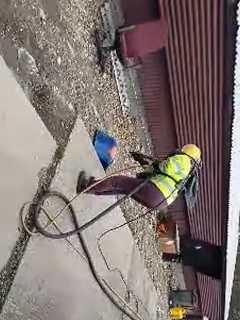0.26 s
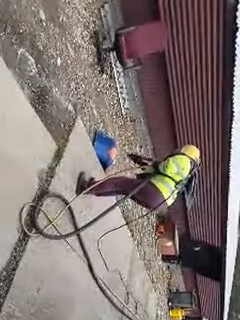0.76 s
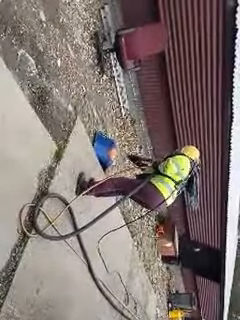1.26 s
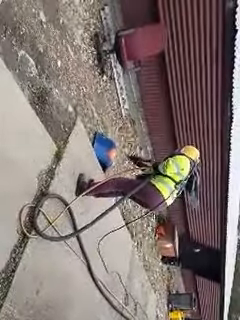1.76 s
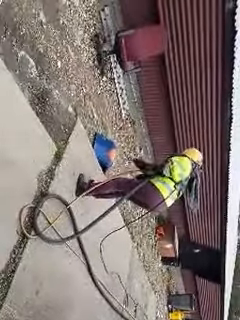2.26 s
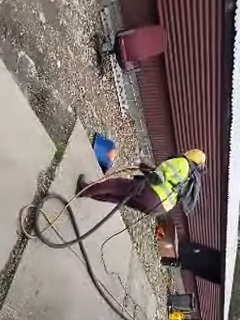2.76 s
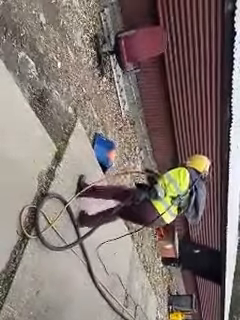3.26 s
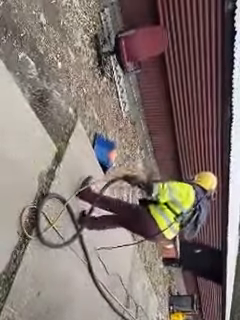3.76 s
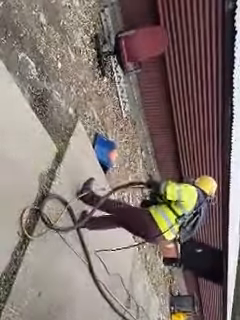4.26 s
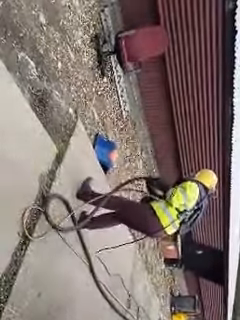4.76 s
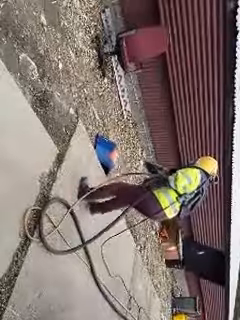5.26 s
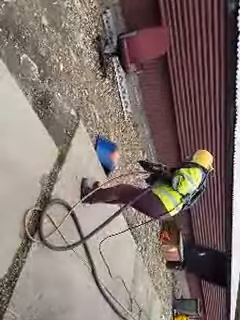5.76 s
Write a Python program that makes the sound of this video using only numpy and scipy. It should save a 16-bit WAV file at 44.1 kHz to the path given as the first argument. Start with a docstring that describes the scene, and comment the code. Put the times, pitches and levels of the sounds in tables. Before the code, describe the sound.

Abrasive blasting roars as a bright steady hiss with faint whistles and sputtering overload; it stops for a moment, leaving compressor drone, then restarts.

```python
"""A loud hiss of air and grit blasting a steel-clad wall outdoors; it stops briefly and starts again.
The jet is coloured noise with short sine screeches, echoed by ground and wall as the nozzle moves.
A compressor drones behind it, as steady tones over a rumble, and comes up when the gain control lets go.
The jet overloads the two microphone ports, the right one most: random thuds sputter, short pushes pop.
Apart from that, soft blips of random pitch burble in the low end."""
import sys
import numpy as np
from scipy import signal
from scipy.fft import rfft, irfft, next_fast_len
from scipy.io import wavfile
from scipy.ndimage import uniform_filter1d, map_coordinates

SR = 44100
rng = np.random.default_rng(int(sys.argv[2]) if len(sys.argv) > 2 else 0)


def transcribe(u):
    """Save the signal u as a 16-bit wav file named by the first command-line argument.

    u: samples, shape (n,) or (channels, n), limited to [-1, 1]; the rate is SR.
    q: integer samples, one column per channel.
    """
    v = np.clip(np.atleast_2d(u).T, -1, 1)
    q = np.round(v * 32767).astype(np.int16)
    wavfile.write(sys.argv[1], SR, q)


N = 265923


def amp(db):
    """Turn decibels into a plain gain."""
    return 10 ** (np.asarray(db) / 20)


def unit(x):
    """Scale a sound to an rms of 1."""
    return x / np.sqrt(np.mean(x ** 2) + 1e-20)


def along(points, hz):
    """Read a curve of (Hz, value) points at any pitch, on a log pitch axis."""
    f, v = np.transpose(points)
    return np.interp(np.log(hz + 1), np.log(f + 1), v)


def clock():
    """The time of every sample, in seconds."""
    return np.arange(N) / SR


def curves(rows):
    """One value per sample for each column after the time."""
    s, *cols = np.transpose(rows)
    return [np.interp(clock(), s, c) for c in cols]


def wobble(rate):
    """A smooth random curve through `rate` random points a second."""
    knots = rng.standard_normal(int(N * rate / SR) + 4)
    return map_coordinates(knots, [clock() * rate])


def bell(s, width):
    """A smooth swell of height 1 around time s; width is its standard deviation in seconds."""
    return np.exp(-.5 * ((clock() - s) / width) ** 2)


def filtered(x, response):
    """Weight every pitch in x by a response, a function of Hz."""
    m = next_fast_len(N + SR // 2)  # spare room for the ringing
    spectrum = rfft(x, m) * response(np.fft.rfftfreq(m, 1 / SR))
    return irfft(spectrum, m)[..., :N]


# force of the jet while the valve is open, ahead of the gain control: t/s, level/dB
JET_FORCE = [(0, 18.5), (.32, 17.5), (.7, 20), (1.4, 18.5), (2.1, 17), (3, 14.2), (3.7, 14), (4.1, 12.8),
             (4.6, 12), (5.15, 16), (5.35, 15), (6.03, 16.5)]
# the valve shuts: the jet collapses fast, then a weak tail bleeds from the hose
SHUT_S, COLLAPSE_DB_PER_S, TAIL_DB, TAIL_DB_PER_S = 4.6005, 468, -26, 131
# the valve reopens and the pressure builds ever faster, from this far below full force
REOPEN_S, BUILD_S, BUILD_CURVE, SHUT_DROP_DB = 4.885, 0.095, 1.5, 65
# one last spit of the emptying hose: time, width and lift
SPIT_S, SPIT_LENGTH_S, SPIT_DB = 4.727, .007, 7.5


def jet_level():
    """Level of the jet in dB: its force, less the pause in which the valve is shut."""
    t = clock()
    force_db, = curves(JET_FORCE)
    shut = np.maximum(t - SHUT_S, 0)
    dying = np.maximum(-COLLAPSE_DB_PER_S * shut, TAIL_DB - TAIL_DB_PER_S * shut)
    progress = np.clip((t - REOPEN_S) / BUILD_S, 0, 1)
    building = SHUT_DROP_DB * (progress ** BUILD_CURVE - 1)
    spit = SPIT_DB * bell(SPIT_S, SPIT_LENGTH_S)
    return force_db + np.maximum(dying, building) + spit


def turbulence(patchy_db, shared):
    """Churning air as noise at two ports, partly the same sound, with random louder and softer patches."""
    direct, *scattered = rng.standard_normal((3, N))
    noise = shared * direct + np.array(scattered)
    z = signal.stft(noise, nperseg=512)[2]
    field = rng.standard_normal(z.shape[1:])
    field = uniform_filter1d(field, size=6, axis=0)  # smooth across pitch
    field = uniform_filter1d(field, size=12, axis=1)  # smooth across time
    return signal.istft(z * amp(patchy_db * unit(field)), nperseg=512)[1][:, :N]


# turbulent mixing noise of the jet, only the shape counts: f/Hz, relative level/dB
HISS = [(150, -71), (480, -42), (780, -16.5), (1130, -20), (1350, -10.5), (1700, -13), (1900, -5.5),
        (2400, -7), (3400, -5.5), (4400, -5), (5500, 2), (7000, -1), (8500, -5.5), (10200, -6), (11300, -9),
        (14500, -10)]
# humps of the shock noise and of the nozzle, on the same scale: f/Hz, width/Hz, relative level/dB
HUMPS = [(1860, 240, -15), (5800, 380, -4.5), (6060, 980, -5.5), (6540, 1800, -6.5)]


def jet_colour(hz):
    """Tone of the jet: broad mixing noise plus the shock and nozzle humps, added as power."""
    humps = 0
    for centre, width, db in HUMPS:
        offset = 2 * (hz - centre) / width
        humps = humps + amp(db) ** 2 / (1 + offset ** 2) ** 2
    return np.sqrt(amp(along(HISS, hz)) ** 2 + humps)


# echoes from ground and wall: delay/ms, strength as a plain gain
ECHOES = [(2.9, 0.036), (5.6, 0.25), (9.5, 0.38), (17, 0.23)]


def echoed(x, drift):
    """Echo paths drift as the nozzle moves and comb the hiss differently at each port."""
    t, out = clock(), x.copy()
    for side in range(2):
        for ms, strength in ECHOES:
            delay = ms / 1000 * (1 + drift * wobble(1.2))
            out[side] += strength * np.interp(t - delay, t, x[side], left=0)
    return out


# how the nozzle points at the microphone: t/s, treble level/dB
AIM = [(0, -1), (.8, -3), (2, -3), (3.1, -3.5), (3.8, -3), (4.4, -1.5), (5.2, -2.5), (6.03, -4)]
# the two ports hear the jet differently: f/Hz, left minus right level/dB
PORTS = [(700, 6), (1200, -4.5), (1950, 2.5), (3200, 1), (4400, -2.5), (5600, 2), (7000, -6.5), (8700, -9),
         (14000, -8)]


def jet():
    """Hiss and screech with echoes; it flutters with the grit feed and dulls as the pressure falls."""
    level_db, (treble_db,) = jet_level(), curves(AIM)

    def ports(hz):
        return amp(np.outer([.5, -.5], along(PORTS, hz)))

    air = turbulence(patchy_db=1.09, shared=0.43)
    hiss = unit(filtered(air, lambda hz: jet_colour(hz) * ports(hz)))
    treble = filtered(hiss, lambda hz: 1 / (1 + (8000 / (hz + 1)) ** 6))
    slack_db = np.minimum(level_db + 6, 0)  # how far the jet is below -6 dB
    hiss = hiss + (amp(treble_db + 0.21 * slack_db) - 1) * treble
    flutter_db = 0.89 * wobble(16) + 0.38 * wobble(140)
    return amp(level_db + flutter_db) * unit(echoed(hiss + screech(), drift=0.0152))


# compressor engine orders, ahead of the gain control: f/Hz, rms level/dB
ENGINE = [(80.7, -50), (161.5, -48), (242.2, -69), (323, -70)]
# outdoor rumble around the compressor, only the shape counts: f/Hz, relative level/dB
YARD = [(25, -7), (120, 8), (300, -9), (450, -4), (700, 5), (1100, 1), (3000, -4), (12000, -36)]


def compressor():
    """The engine's firing orders, as slightly unsteady sines, over a soft outdoor rumble."""
    turn = clock() + np.cumsum(0.004 * wobble(21)) / SR  # running time of an engine that is not quite even
    drone = np.zeros(N)
    for hz, db in ENGINE:
        drone += amp(db) * np.sqrt(2) * np.sin(2 * np.pi * hz * turn)
    rumble = unit(filtered(rng.standard_normal((2, N)), lambda hz: amp(along(YARD, hz))))
    return drone + amp(-46.0) * rumble


def gain_control(x, knee_db, window):
    """Above the knee the level grows a third as fast, which pushes the compressor drone down."""
    power = uniform_filter1d(np.mean(x ** 2, axis=0), int(window * SR))  # window in seconds
    power = np.abs(power) + 1e-12
    excess_db = np.maximum(10 * np.log10(power) - knee_db, 0)
    return x * amp(excess_db / 3 - excess_db)


def saturated(x, top, grit_hz):
    """Rounding the peaks adds a harsh grit; only the part of it above the bass is kept."""
    rounded = x / (1 + (x / top) ** 6) ** (1 / 6)
    return x + filtered(rounded - x, lambda hz: 1 / (1 + (grit_hz / (hz + 1)) ** 6))


# a sputter of the overloaded port, only the shape counts: f/Hz, relative level/dB
SPUTTER = [(20, -27), (45, -11), (80, 1), (150, 2), (280, -1.5), (500, -4), (1000, -10), (2000, -13),
           (5000, -44)]
# sputter depth at full overload; flurry around each pop, against the pop's push, and its width
SPUTTER_DB, FLURRY_DB, FLURRY_S = -17.5, -14.5, 0.013
# overload: jet level at which it sets in, how far below full overload it is there, how abruptly it comes
OVERLOAD_ONSET_DB, OVERLOAD_SHORTFALL_DB, OVERLOAD_STEEPNESS = 14, 29, 4.6


def sputter(rate, spread_db, clump_db, left_db):
    """Low thuds of overloaded ports: random kicks that thin out as the jet weakens and crowd round pops."""
    weakness = amp(OVERLOAD_ONSET_DB - jet_level()) ** OVERLOAD_STEEPNESS
    steady = amp(SPUTTER_DB - OVERLOAD_SHORTFALL_DB * np.minimum(weakness, 10))
    flurries = sum(amp(db + FLURRY_DB) * bell(s, FLURRY_S) for s, db in POPS)
    depth = np.hypot(steady, flurries)
    happens = rng.random((2, N)) < rate * depth / SR
    size = amp(spread_db * rng.standard_normal((2, N)))
    kicks = happens * size * rng.choice([-1, 1], (2, N))
    # depth sets both how often a kick comes and how strong it is
    thuds = filtered(kicks * np.sqrt(depth), lambda hz: amp(along(SPUTTER, hz)) * (hz > 15))
    clumps = amp(clump_db * np.array([wobble(21.8), wobble(22.235)]))
    return unit(thuds * clumps) * np.sqrt(np.mean(depth ** 2)) * amp([[left_db], [0]])


# low burble, loudness of a blip by its pitch, added to BLIP_DB: f/Hz, level/dB
BURBLE = [(110, -2), (170, -2), (260, -1), (400, -6.5), (600, 0), (1000, -1)]
# when the jet is at 14 dB: soft low blips a second, their length and base level
BLIP_JET_DB, BLIPS_PER_S, BLIP_S, BLIP_DB = 14, 50, 0.053, -29.5
# growth of the blip rate and of the blip level with the jet (dB per dB)
BLIP_GROWTH, BLIP_SWELL = 2.3, 0.33


def burble(low_hz, high_hz, spread_db, left_db, count):
    """Short soft blips of random pitch in the low end, denser and louder under a stronger jet."""
    t = np.arange(int(BLIP_S * SR)) / SR
    out = np.zeros((2, N + len(t)))
    drive_db = jet_level() - BLIP_JET_DB
    # each of `count` candidates sounds with this chance
    chance = BLIPS_PER_S * amp(BLIP_GROWTH * drive_db) * N / SR / count
    for side in range(2):
        draws = zip(rng.random((count, 4)), rng.standard_normal(count))
        for (when, luck, pitch, phase), size in draws:
            start = int(when * N)
            if luck < chance[start]:
                hz = low_hz * (high_hz / low_hz) ** (pitch ** .8)
                db = BLIP_DB + along(BURBLE, hz) + BLIP_SWELL * drive_db[start] + spread_db * size
                blip = np.hanning(len(t)) * np.sin(2 * np.pi * (hz * t + phase))
                out[side, start:start + len(t)] += amp(db) * blip
    return out[:, :N] * amp([[left_db], [0]])


# the shock cells lock into a screech: t/s, length/s (bell width), f/Hz, peak level against the hiss rms/dB
SCREECH = [(.53, .05, 5600, -16), (0.78, 0.013, 5500, -5), (0.82, 0.025, 5500, -17),
           (0.82, 0.021, 6770, -7), (2.2, 0.35, 5520, -12), (2.206, 0.42, 5900, -12), (3.1, .5, 6480, -33),
           (3.1, 0.5, 6040, -20), (4.3, 0.61, 6040, -13), (4.998, 0.024, 5590, -17)]


def screech():
    """Narrow whistles of the shock cells: unsteady sines that swell and vanish inside the hiss."""
    out = np.zeros(N)
    for s, length, hz, db in SCREECH:
        phase = 2 * np.pi * np.cumsum(hz + 35 * wobble(120)) / SR
        out += amp(db + 1.3 * wobble(60)) * bell(s, length) * np.sin(phase)
    return out


# loudest overload pops, the push on the right port before its recoil: t/s, peak level/dB
POPS = [(2.343, -9), (2.56, -11), (2.813, -11.5), (2.869, -11.5), (3.099, -11.5), (3.165, -16),
        (3.572, -16), (3.605, -19.5), (3.672, -15.5), (4.078, -12.5), (4.283, -13), (5.054, -17.5),
        (5.175, -14.5), (5.389, -13), (5.472, -7.5), (5.602, -13), (5.684, -13.5), (5.882, -12)]


def pops(width, recoil, left_db):
    """Each hard overload is a short push and a slow recoil, strong on the right port, faint on the left."""
    pushes = sum(amp(db) * bell(s, width) for s, db in POPS)
    # a gentle cut below `recoil` Hz makes the swing back
    return filtered(pushes, lambda hz: 1j * hz / (recoil + 1j * hz)) * amp([[left_db], [0]])


def scene():
    """Jet and compressor together."""
    return jet() + compressor()


TOP_HZ = 14650  # nothing is kept from here up


def record(dry):
    """Gain control, overload with its sputter and pops, a soft low burble, and the band limit."""
    hot = saturated(gain_control(dry, knee_db=-16.5, window=0.024), top=0.97, grit_hz=730)
    hot = hot + sputter(rate=12000, spread_db=2, clump_db=2.5, left_db=-22)
    hot = hot + pops(width=0.00061, recoil=57, left_db=-29)
    hot = hot + burble(low_hz=124.8, high_hz=1301, spread_db=2.5, left_db=-3.5, count=2000)
    return filtered(hot, lambda hz: hz < TOP_HZ)


dry = scene()
out = record(dry)
transcribe(out)
```